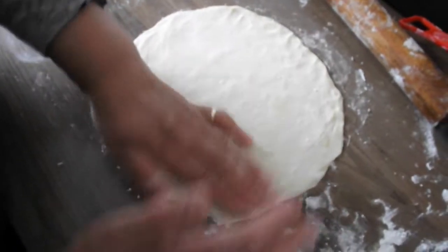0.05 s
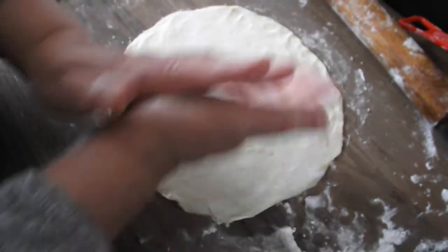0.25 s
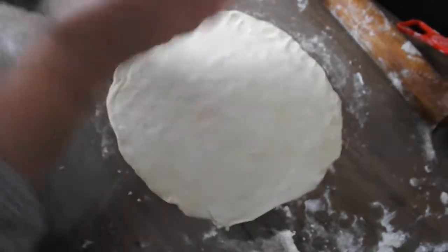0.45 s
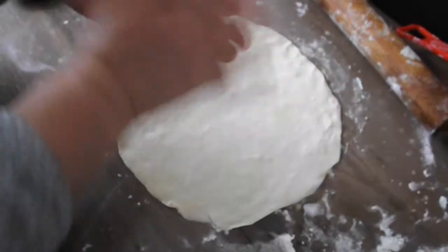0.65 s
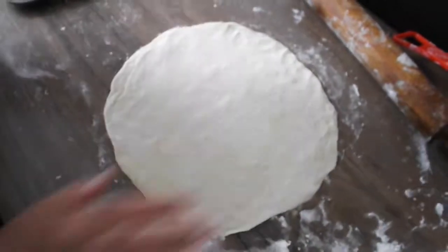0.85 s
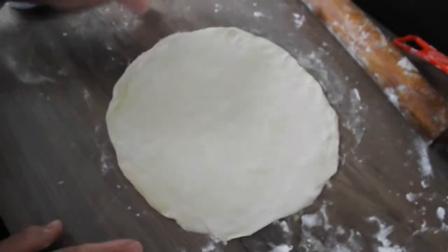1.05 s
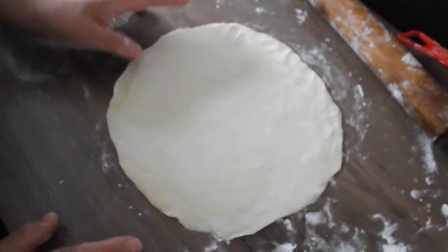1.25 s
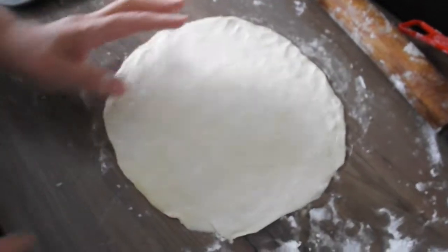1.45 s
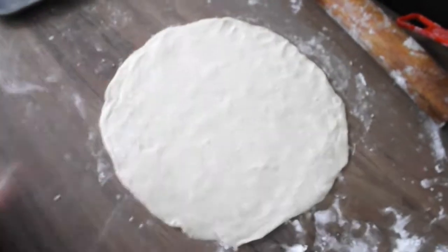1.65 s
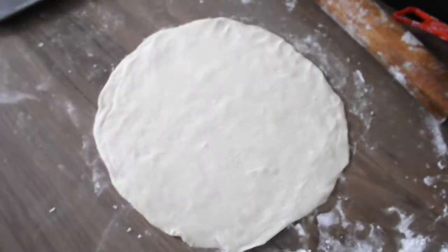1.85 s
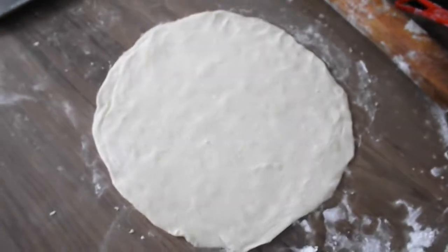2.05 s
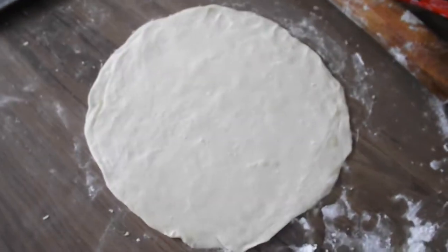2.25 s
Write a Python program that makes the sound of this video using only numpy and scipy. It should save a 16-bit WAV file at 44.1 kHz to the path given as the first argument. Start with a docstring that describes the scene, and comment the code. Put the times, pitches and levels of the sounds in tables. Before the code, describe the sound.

A palm patting floury dough: a dry brushing stroke, one sharp smack, then soft dull pats

```python
"""First comes a low, soft pat over faint kitchen noise; then a palm brushes across floury dough on a board.
One sharp smack follows, then more soft pats and small sticky ticks. A hiss and a low rumble of air lie below.
Brushing and pats are crowds of tiny random slips sent through filters; the smack is one filtered click.
Ticks are short fading noise bursts, and the background is shaped noise. The close microphone is strongest
near 3 kHz; a short, weak room echo surrounds the hands."""
import sys
import numpy as np
from scipy import signal
from scipy.fft import rfft, irfft
from scipy.io import wavfile
from scipy.ndimage import uniform_filter1d

SR = 44100
rng = np.random.default_rng(int(sys.argv[2]) if len(sys.argv) > 2 else 0)


def unload_wav(signal):
    """Save mono or channel-first audio to the path in sys.argv[1] as 16-bit WAV at rate SR, clipped to [-1, 1]."""
    wavfile.write(
        sys.argv[1],
        SR,
        np.round(np.clip(np.atleast_2d(signal).T, -1, 1) * 32767).astype(np.int16),
    )


N = 101430
T = np.arange(N) / SR  # time in seconds


def amp(db):
    """Turns decibels into a gain."""
    return 10 ** (np.asarray(db) / 20)


def unit(x):
    """Scales a sound to an average strength (rms) of 1."""
    return x / np.sqrt(np.mean(x ** 2) + 1e-20)


def level(points, held=False):
    """Draws a gain over time through (time, dB) points; silent outside them unless held."""
    time_s, level_db = np.transpose(points)
    inside = (T >= time_s[0]) & (T <= time_s[-1])
    return amp(np.interp(T, time_s, level_db)) * (held | inside)


# how strongly the microphone picks up each pitch: (pitch_hz, gain_db)
MICROPHONE = [(20, 10), (1500, 1), (2300, 8.5), (2800, 14), (3130, 21.5), (3400, 20), (3800, 10), (5000, 1),
              (7000, -5), (16000, -16.5)]


def response(spectrum, hz):
    """Gain at each pitch: the source's own tone colour plus the microphone's, added in dB."""
    total_db = 0
    for curve in (spectrum, MICROPHONE):
        pitch_hz, gain_db = np.transpose(curve)
        total_db = total_db + np.interp(np.log(hz + 1), np.log(pitch_hz + 1), gain_db)
    return amp(total_db)


def impulse(spectrum, size=4096):
    """A click of energy 1 with the given tone colour, its energy packed as early as possible."""
    gain = response(spectrum, abs(np.fft.fftfreq(size, 1 / SR)))
    # the Hilbert transform finds the phase that puts the energy at the start
    log_spectrum = np.conj(signal.hilbert(np.log(gain + 1e-5)))
    click = np.fft.ifft(np.exp(log_spectrum)).real[:size // 2]
    return click / np.linalg.norm(click)


def convolve(x, ring):
    """Lets every sample of x set off a copy of the ring."""
    return signal.fftconvolve(x, ring)[:N]


def noise(spectrum):
    """Steady random noise of rms 1 with the given tone colour."""
    white = rfft(rng.standard_normal(N))
    return unit(irfft(white * response(spectrum, np.fft.rfftfreq(N, 1 / SR)), N))


def grains(per_s, spread_db, smooth):
    """Friction as tiny slips of random timing, sign and size, mixed with a smooth share of noise."""
    hits = rng.random(N) < per_s / SR
    signs = rng.choice([-1, 1], N)
    sizes = amp(spread_db * np.minimum(rng.exponential(1, N), 3))
    return unit(unit(hits * signs * sizes) + smooth * rng.standard_normal(N))


def flutter(depth_db, size):
    """A gain that wavers at random; averaging twice over size samples slows it down."""
    slow = uniform_filter1d(uniform_filter1d(rng.standard_normal(N), size), size)
    return unit(amp(depth_db * np.clip(unit(slow), -2, 2)))


def hump(hz, fall_db):
    """Tone colour with a rounded peak at hz, falling by about fall_db per octave farther out."""
    return [(hz * 2. ** k, -fall_db * (np.hypot(k, .5) - .5)) for k in np.arange(-10, 10, .5)]


def puff(spectrum, fade_s):
    """A noise burst of peak 1 that dies away within a few fade times."""
    t = T[:SR // 20]
    fading = rng.standard_normal(len(t)) * np.exp(-t / fade_s)
    burst = signal.fftconvolve(fading, impulse(spectrum))
    return burst / abs(burst).max()


def add(mix, start_s, sound):
    """Mixes a sound in at its start time, cutting it at the end of the scene."""
    part = mix[round(start_s * SR):][:len(sound)]
    part += sound[:len(part)]


# tone colours of kitchen noise, hiss and low moving air: (pitch_hz, relative_level_db)
KITCHEN_TONE = [(20, 15), (100, 10), (170, 7.5), (300, 8.5), (500, 5), (1000, 1.5), (1500, 4.5),
                (3250, -7.5), (5000, -6.5), (7000, -4), (10000, 1), (15500, 4)]
HISS_TONE = [(200, -28), (1000, 2), (2000, 0), (3250, 1), (4500, 1), (7000, -5.5), (10000, -13),
             (15500, -21)]
AIR_TONE = [(5, -11), (12, -4), (19, -3), (30, -18), (58, -16), (90, -38.5), (200, -45), (1000, -110)]
# loudness of the hiss and of the low rumble of air: (time_s, level_db)
HISS_LOUDNESS = [(0, -60), (.1, -60), (.52, -56), (.68, -47.5), (.73, -41.5), (.8, -43), (.98, -47.5),
                 (1.1, -40.5), (1.2, -45), (1.36, -39.5), (1.41, -41.5), (1.52, -40), (1.58, -42),
                 (1.72, -36), (1.8, -41), (1.94, -38.5), (2.09, -37.5), (2.135, -47.5), (2.22, -40.5),
                 (2.255, -43.5), (2.3, -37.5)]
AIR_LOUDNESS = [(0, -37), (.28, -39), (.35, -34), (.43, -43), (.81, -42), (.89, -34), (1.02, -33),
                (1.06, -41), (1.5, -41), (1.63, -34), (1.91, -42), (2.3, -46)]
KITCHEN_DB = -46.5


def background():
    """Steady kitchen noise, a wavering hiss and a low rumble of air moving at the microphone."""
    kitchen = amp(KITCHEN_DB) * noise(KITCHEN_TONE)
    hiss = noise(HISS_TONE) * level(HISS_LOUDNESS, held=True) * flutter(depth_db=1.0, size=350)
    air = noise(AIR_TONE) * level(AIR_LOUDNESS, held=True)
    return kitchen + hiss + air


ROOM_DB, ROOM_T60_S = -11, 0.27  # echo strength; time to fall by 60 dB


def room(x):
    """Many blurred reflections, modelled as fading noise that starts 3 ms after the sound."""
    t = T[:SR // 2]
    tail = rng.standard_normal(len(t)) * amp(-60 * t / ROOM_T60_S) * (t > .003)
    return amp(ROOM_DB) * convolve(x, tail / np.linalg.norm(tail))


LEFT_DELAY_S, HALF_DELAY_HZ = 2.3e-5, 1400  # left side's delay in the high treble; pitch with half of it
SIDE_HISS_DB = -56


def stereo(x):
    """Stereo: bass the same on both sides, treble slightly later on the left, faint opposite-sign hiss."""
    hz = np.fft.rfftfreq(N, 1 / SR)
    delay_s = LEFT_DELAY_S * hz ** 2 / (hz ** 2 + HALF_DELAY_HZ ** 2)
    left = irfft(rfft(x) * np.exp(-2j * np.pi * hz * delay_s), N)
    # tone colour of the side hiss: (pitch_hz, relative_level_db)
    side_hiss = amp(SIDE_HISS_DB) * noise([(150, -17), (500, -12.5), (3250, 9), (7000, 8), (15500, 9)])
    return np.array([left + side_hiss, x - side_hiss])


# small sticky ticks of skin and dough: (start_s, peak_db, centre_hz, fade_s)
STICKY_TICKS = [(1.0136, -27.5, 10000, 0.0013), (1.026, -41, 8000, 0.0026), (1.0617, -21.5, 1720, 0.0026),
                (1.066, -31, 3800, 0.0013), (1.1099, -22.5, 2580, 0.00026), (1.121, -23, 2160, 0.00088),
                (1.594, -20, 1700, .0004), (1.5977, -37, 3300, .0004), (1.6007, -20.5, 3800, 0.0012)]
TICK_FALL_DB = 12.5  # about this much per octave either side of the centre


def ticks():
    """Skin leaving the dough gives tiny crackles, each centred on its own pitch."""
    out = np.zeros(N)
    for start_s, peak_db, centre_hz, fade_s in STICKY_TICKS:
        add(out, start_s, amp(peak_db) * puff(hump(centre_hz, TICK_FALL_DB), fade_s))
    return out


# the palm sliding over flour: (time_s, level_db)
BRUSH_STROKE = [(.1, -59), (.128, -39), (.146, -42.5), (.166, -31), (.194, -42.5), (.232, -25.5),
                (.258, -21), (.284, -17), (.31, -21.5), (.327, -18.5), (.35, -27), (.398, -39), (.44, -60)]
# soft hiss swelling just before the smack and fading after it: (time_s, level_db)
SMACK_HISS = [(.552, -44), (.564, -27.5), (.576, -22), (.587, -32.5), (.62, -35), (.632, -36), (.641, -34),
              (.662, -41), (.685, -52)]
# tone colour of skin on flour, also used for the soft hiss: (pitch_hz, relative_level_db)
FLOUR_TONE = [(60, -15), (300, -29), (800, -17.5), (1500, -12.5), (2300, -7), (3250, 0.5), (5000, 2),
              (7000, 2), (10000, 1.5), (15500, -2)]


def brush():
    """Skin slides over flour in dense, wavering tiny slips; the same grains make the hiss around the smack."""
    slips = grains(per_s=4100, spread_db=2.5, smooth=1.0) * flutter(depth_db=0.5, size=70)
    loudness = level(BRUSH_STROKE) + level(SMACK_HISS)
    return convolve(slips * loudness, impulse(FLOUR_TONE))


# soft pats: (start_s, rise_s, fade_s, thud_hz, thud_db, board_db, slap_db, skin_db)
SOFT_PATS = [(0, 0.017, 0.049, 65, -37.5, -56.5, -68, -45.5),
             (.70, 0.016, 0.065, 264, -48.5, -52.5, -54.5, -62),
             (0.89, 0.013, 0.023, 130, -30, -41.5, -50.5, -30),
             (1.104, 0.0066, 0.019, 284, -41, -43.5, -43.5, -36),
             (1.2973, 0.0016, 0.038, 127, -40, -36, -32.5, -35.5),
             (1.592, .004, 0.031, 200, -68, -55, -39.5, -27),
             (1.953, 0.027, 0.036, 282, -41.5, -35, -38, -24.5),
             (1.97, 0.013, 0.016, 201, -38.5, -28, -51, -31)]
# ringing tones of the board: (pitch_hz, relative_level_db, t60_s)
BOARD_RING = [(203, -11.5, 0.18), (262, -5, 0.063), (310, -1, 0.05), (370, 5, 0.031), (424, 0.5, 0.025),
              (475, -0.5, 0.023), (596, 0, 0.047), (662, -7.5, 0.021)]
# tone colours of the dull slap and the skin's fizz: (pitch_hz, relative_level_db)
SLAP_TONE = [(100, -34), (400, -12), (750, 5), (1300, -0.5), (2000, -6.5), (3200, -18), (8000, -48)]
SKIN_TONE = [(200, -41), (1000, 6.5), (2200, 3.5), (3250, 2), (4500, 3.5), (7000, -4.5), (10000, -5.5),
             (15500, -14)]
THUD_FALL_DB = 30.5  # about this much per octave either side of the thud's pitch


def pats():
    """Each landing palm makes many small contacts that drive a dough thud, the board, a slap and skin fizz."""
    t = T[:SR // 4]
    board = np.zeros(len(t))
    for k, (pitch_hz, level_db, t60_s) in enumerate(BOARD_RING):
        sign = (-1) ** k  # neighbouring tones start in opposite directions
        board += sign * amp(level_db - 60 * t / t60_s) * np.sin(2 * np.pi * pitch_hz * t)
    shared_rings = [board, impulse(SLAP_TONE), impulse(SKIN_TONE)]
    out = np.zeros(N)
    for start_s, rise_s, fade_s, thud_hz, *levels_db in SOFT_PATS:
        age = T - start_s
        press = np.clip(age / rise_s, 0, 1) * np.exp(-np.maximum(age - rise_s, 0) / fade_s)
        contacts = press * grains(per_s=1500, spread_db=4.0, smooth=0.55)
        strength = np.sqrt(np.mean(press ** 2))
        thud = impulse(hump(thud_hz, THUD_FALL_DB))
        for ring, level_db in zip([thud] + shared_rings, levels_db):
            out += amp(level_db) * unit(convolve(contacts, ring)) * strength
    return out


# the sharp smack: (start_s, peak_db)
SHARP_SMACK = (.5715, -3.5)
# tone colour of its crack: (pitch_hz, relative_level_db)
CRACK_TONE = [(60, -16), (200, -10.5), (900, -1.5), (1800, -5), (2600, -3.5), (3250, -17), (4100, -2.5),
              (4900, 8), (6000, -18), (8200, -7), (9200, -31), (15500, -41)]
PUFF_DB, PUFF_FADE_S = -23, .004  # peak and fade of the flour puff


def smack():
    """One hard hit gives a single sharp crack, together with a short high puff of flour."""
    out, crack = np.zeros(N), impulse(CRACK_TONE)
    start_s, peak_db = SHARP_SMACK
    add(out, start_s, amp(peak_db) * crack / abs(crack).max())
    add(out, start_s, amp(PUFF_DB) * puff(hump(hz=10000, fall_db=8), PUFF_FADE_S))
    return out


def scene():
    """Hands, dough and board in the kitchen, spread over two stereo sides."""
    hands = ticks() + brush() + pats() + smack()
    return stereo(background() + room(hands) + hands)


CUTOFF_HZ = 15800


def record(dry):
    """A steep filter removes the treble above the cutoff."""
    low_pass = signal.firwin(511, CUTOFF_HZ, window=("kaiser", 9), fs=SR)
    return signal.oaconvolve(dry, low_pass[None], "same")


dry = scene()
out = record(dry)
unload_wav(out)
```